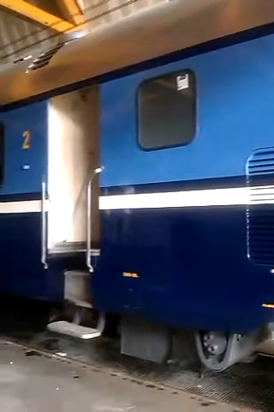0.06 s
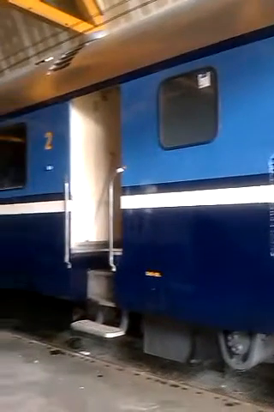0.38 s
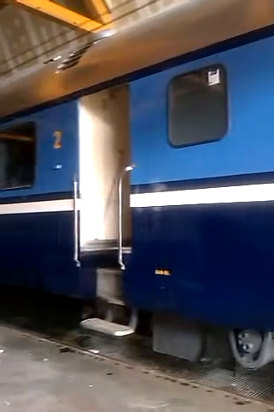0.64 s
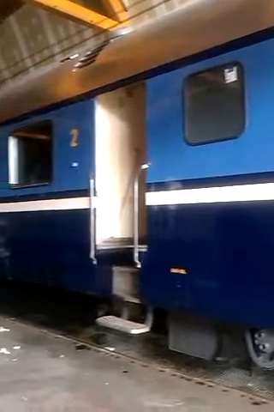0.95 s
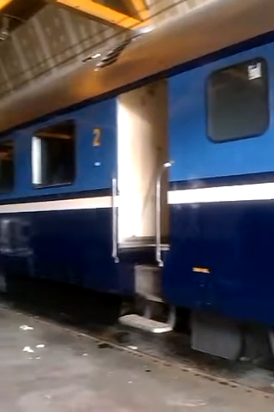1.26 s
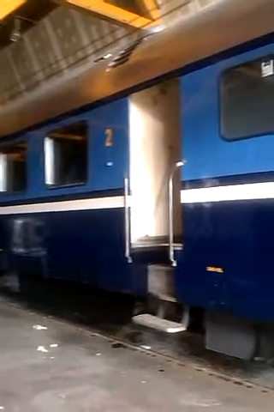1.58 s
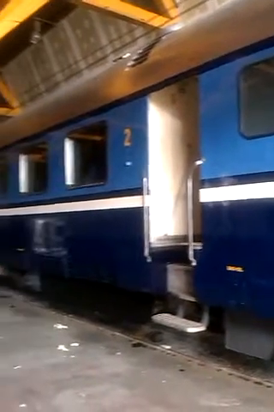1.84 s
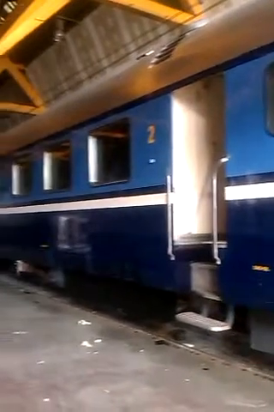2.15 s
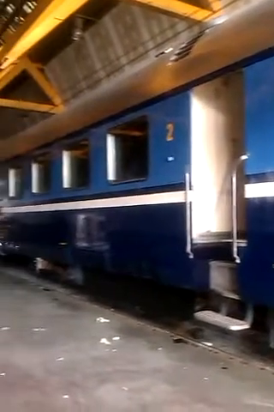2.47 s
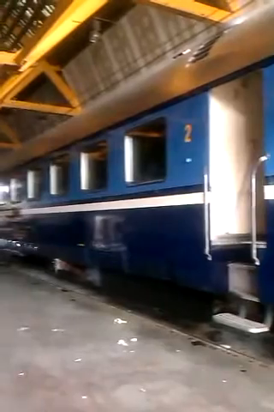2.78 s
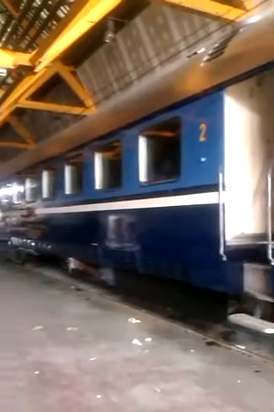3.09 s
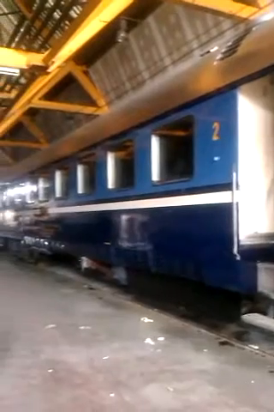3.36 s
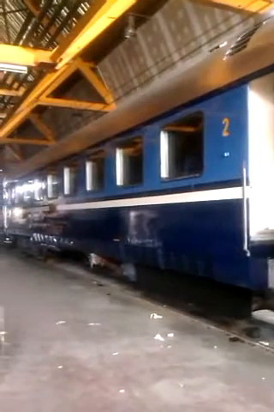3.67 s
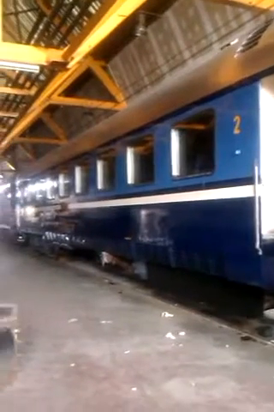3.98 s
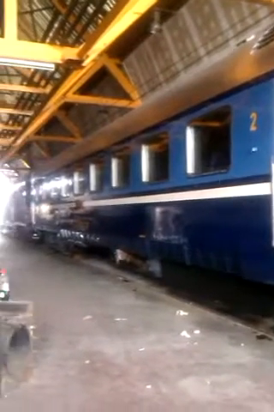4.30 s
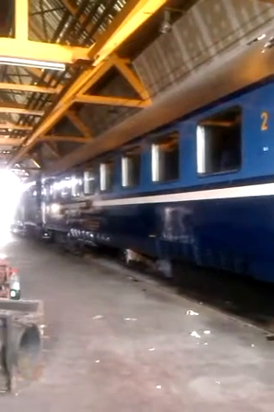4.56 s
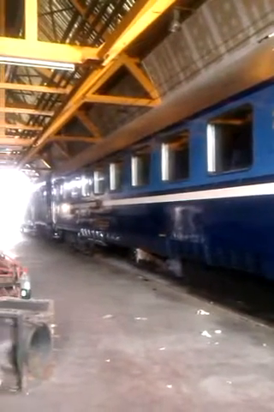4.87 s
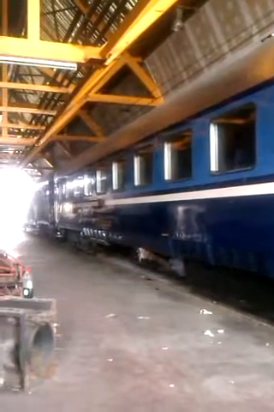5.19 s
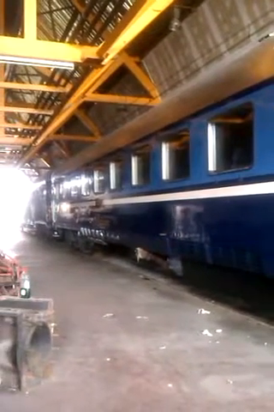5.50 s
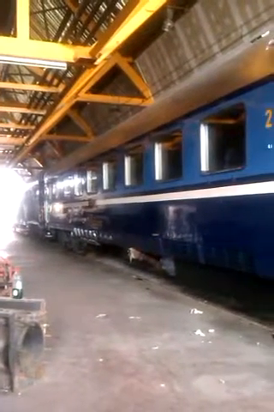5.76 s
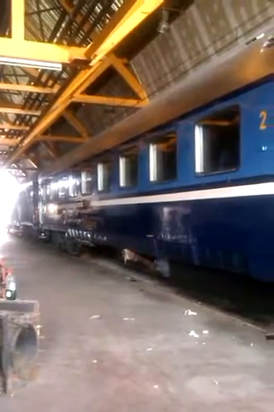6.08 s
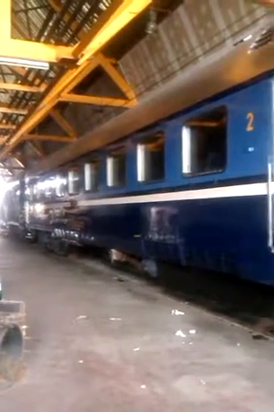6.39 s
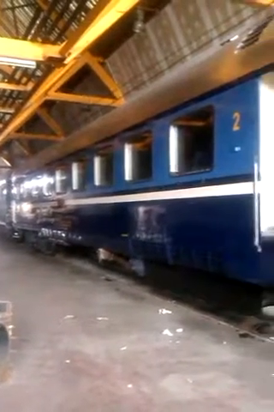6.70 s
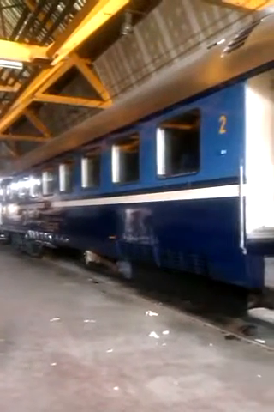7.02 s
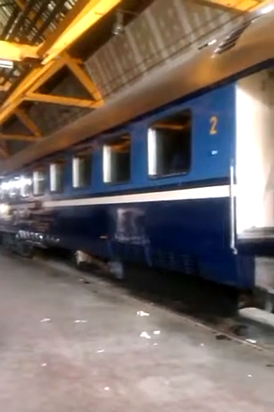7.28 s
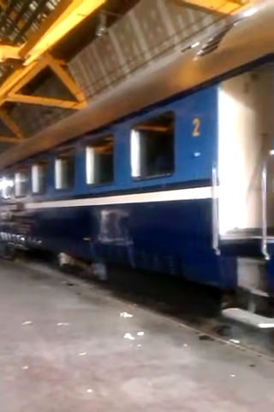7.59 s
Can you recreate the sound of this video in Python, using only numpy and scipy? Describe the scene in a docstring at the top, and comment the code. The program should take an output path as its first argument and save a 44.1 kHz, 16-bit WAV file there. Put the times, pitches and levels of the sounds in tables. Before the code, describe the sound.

A diesel railcar engine idles close by in a workshop hall, loud and even from the first moment through all eight seconds. Its dense drone chugs about six or seven times a second, the speed swaying only very slightly. On top are a fast metallic clatter from the cylinders and a steady whine of several gear tones, blurred by the hall. Behind them a cooling fan gives a low hum and a rush of air, with a faint, thin, high whistle that flutters.

Between about 2 and 3.5 seconds the listener turns to look down the hall, and the whine and clatter soften a little and stay that way. The whistle dips briefly around 3 seconds. At about 7.3 seconds one gear tone rings out for half a second, and around 7.5 seconds the drone grows slightly fuller as the engine keeps running.

```python
"""A diesel railcar engine idles at about 785 rpm in a workshop hall, its speed swaying gently.
Exhaust and engine block repeat one four-stroke cycle 6.5 times a second, making a dense, chugging drone.
Over it, six cylinders clatter as they fire and gear teeth whine as they mesh. Behind it, the cooling
fan hums, its air rushes, and air in a narrow gap gives a thin, fluttering whistle.
The engine softens a little as the listener turns away to look down the hall."""
import sys
import numpy as np
from scipy import signal
from scipy.fft import rfft, irfft, next_fast_len
from scipy.io import wavfile

SR = 44100
rng = np.random.default_rng(int(sys.argv[2]) if len(sys.argv) > 2 else 0)


def to_wav(s):
    """Save 16-bit WAV."""
    ch = np.atleast_2d(s).T  # columns
    pcm = np.round(np.clip(ch, -1, 1) * 32767)  # PCM
    wavfile.write(sys.argv[1], SR, pcm.astype(np.int16))


N = 346185
TIME = np.arange(N) / SR
IDLE_RPM, CYLINDERS = 785.3, 6


def amp(db):
    """Turns decibels into a gain to multiply by."""
    return 10 ** (np.asarray(db) / 20)


def unit(x):
    """Scales a signal to an average strength (rms) of 1."""
    return x / np.sqrt(np.mean(abs(x) ** 2) + 1e-20)


def level_at(spectrum, hz):
    """Looks up a level in dB between the pitches of a table."""
    pitch_hz, level_db = np.transpose(spectrum)
    return np.interp(np.log(hz + 1), np.log(pitch_hz + 1), level_db)


def colour(noise, spectrum):
    """Shapes white noise of rms 1 to a table of levels in dB per Hz."""
    size = next_fast_len(N)
    gain = amp(level_at(spectrum, np.fft.rfftfreq(size, 1 / SR))) * np.sqrt(SR / 2)
    return irfft(rfft(noise, size) * gain, size)[:N]


def wander(hz):
    """A smooth random wobble of rms 1 that moves up to about hz times a second."""
    size = next_fast_len(N)
    freqs = np.fft.rfftfreq(size, 1 / SR)
    spectrum = rng.standard_normal((len(freqs), 2)) @ [1, 1j]
    return unit(irfft(spectrum * (freqs > 0) / (1 + (freqs / hz) ** 2), size)[:N])


def bump(middle_s, length_s):
    """Rises from 0 to 1 and falls back, with a flat top."""
    return np.exp(-(2 * (TIME - middle_s) / length_s) ** 4)


def fuzzy_tone(hz, width_hz, clock_s):
    """A tone of rms 1 that wobbles at random, smearing its pitch over width_hz."""
    blur = wander(width_hz / 2) + 1j * wander(width_hz / 2)
    return unit((blur * np.exp(2j * np.pi * hz * clock_s)).real)


# Cooling air and the rumble of the hall: pitch_hz, level_db_per_hz
AIR_SPECTRUM = [(12, -85), (35, -73), (48, -63.5), (62, -70), (108, -59.5), (135, -60), (190, -61),
                (240, -54.5), (600, -53.5), (950, -50.5), (1300, -58.5), (2600, -58.5), (5000, -85.5),
                (16000, -130)]
def air_rush(swell_db=0.4, swell_hz=5):
    """Swirling air from the cooling fan makes a slightly uneven rush."""
    return colour(rng.standard_normal(N) * amp(swell_db * wander(swell_hz)), AIR_SPECTRUM)


# The tones of the fan's hum: waves_per_turn, level_db
FAN_TONES = [(1, -43.5), (2, -41.5), (3, -42), (4, -53), (5, -39.5), (17, -40)]
def fan_hum(cycles, turns_per_cycle=6.838):
    """The fan spins at its own speed, so its low hum beats against the engine's tones."""
    turns = cycles * turns_per_cycle
    return sum(amp(db) * np.sqrt(2) * np.sin(2 * np.pi * (waves * turns + rng.random()))
               for waves, db in FAN_TONES)


# The tones of the whistle: pitch_hz, width_hz, relative_level_db
WHISTLE_TONES = [(7550, 156, -46.5), (8180, 38, -56.5), (13940, 70, -67.5)]
# Where the whistle falters: middle_s, length_s, change_db
WHISTLE_DIPS = [(3.198, 0.65, -4)]
def air_whistle(gain_db=1, flutter_db=1.1, flutter_hz=10):
    """Air through a narrow gap whistles high, flutters and briefly falters."""
    dip_db = sum(db * bump(middle_s, length_s) for middle_s, length_s, db in WHISTLE_DIPS)
    strength = amp(gain_db) * unit(amp(dip_db + flutter_db * wander(flutter_hz)))
    return strength * sum(amp(db) * fuzzy_tone(hz, width_hz, TIME) for hz, width_hz, db in WHISTLE_TONES)


# The gears' tones at average speed: pitch_hz, width_before_blur_hz, level_db, turned_away_change_db
GEAR_TONES = [(876, 4, -42.5, 0.5), (1210, 8, -38.5, 1), (1439, 6, -32.5, -3.5), (1585, 4, -38, 0),
              (2151, 10, -33.5, 0), (2310, 3, -39, -1), (2538, 5.7, -32.5, -6), (2660, 33, -35, -2.5),
              (3192, 4, -39, 0), (4068, 28, -42.5, -1.5)]
# The gear tone nearest this pitch rings out briefly: pitch_hz, middle_s, length_s, rise_db
GEAR_RING = (1437, 7.35, .55, 7.5)
def gear_whine(cycles, cycle_hz, away, core_hz=9, blur_hz=11):
    """Meshing teeth sing in step with the engine: each a steady tone inside a blur of echoes."""
    clock_s = cycles / cycle_hz  # runs fast or slow with the engine
    ring_hz, middle_s, length_s, rise_db = GEAR_RING
    ringing_hz = min((row[0] for row in GEAR_TONES), key=lambda hz: abs(hz - ring_hz))
    whine = np.zeros(N)
    for hz, width_hz, db, away_db in GEAR_TONES:
        steady = np.sqrt(2) * np.sin(2 * np.pi * (hz * clock_s + rng.random()))
        echoes = fuzzy_tone(hz, width_hz + blur_hz, clock_s)
        tone = unit(core_hz / width_hz * steady + echoes)  # tones wider than core_hz are mostly blur
        ring_db = rise_db * bump(middle_s, length_s) if hz == ringing_hz else 0
        whine += amp(db + away_db * away + ring_db) * tone
    return whine


# The noise of burning fuel and valves: pitch_hz, relative_level_db_per_hz
CLATTER_SPECTRUM = [(300, -67), (900, -58), (1300, -56), (1600, -52), (2150, -51.5), (2650, -55),
                    (3100, -56.5), (3400, -61), (3900, -61.5), (4500, -69.5), (5800, -75.5), (6750, -79.5),
                    (7150, -86.5), (8600, -92.5), (10200, -93), (11200, -118)]
def cylinder_clatter(cycles, cycle_hz, decay_s=0.0068, cylinder_db=3.0, firing_db=5.0, hall_fill=2.13):
    """Each firing is a burst of rattling metal, no two alike; the hall fills the gaps between them."""
    firing, since_firing = np.divmod(cycles * CYLINDERS, 1)
    firing = firing.astype(int)
    db = cylinder_db * rng.uniform(-1, 1, CYLINDERS)[firing % CYLINDERS]  # each cylinder has its level
    db += firing_db * np.clip(rng.standard_normal(N), -2, 2)[firing]  # and each firing strays from it
    bursts = amp(db) * np.exp(-since_firing / (CYLINDERS * cycle_hz * decay_s))
    rattle = np.hypot(bursts, hall_fill) * rng.standard_normal(N)
    return colour(unit(rattle), CLATTER_SPECTRUM)


# Each pitch range crosses the hall by its own path and chugs at its own moment; quick swells are the
# exhaust pulsing: low_hz, high_hz, swells_per_cycle, depth_0_to_1, moment_cycles
CHUG_PATTERN = [(205, 245, 1, .65, .98), (205, 245, 2, .5, .01), (245, 320, 1, .8, .31),
                (205, 320, 1, .58, .25), (205, 320, 2, .38, .13), (205, 320, 3, .17, .32),
                (205, 320, 5, .4, .1), (340, 460, 1, .35, .84), (340, 460, 9, .45, .09),
                (460, 520, 1, .65, .31), (460, 520, 2, .35, .03), (520, 600, 1, .8, .94),
                (600, 800, 1, .3, .66), (600, 800, 2, .5, .21), (600, 800, 3, .55, .25),
                (250, 500, 1, .28, .31), (250, 500, 2, .18, .09), (250, 500, 3, .1, .32),
                (205, 700, 1, .26, .23), (205, 700, 2, .24, .12), (205, 700, 3, .1, .24),
                (205, 700, 4, .12, .1), (205, 700, 5, .12, .07), (205, 700, 6, .12, .13),
                (205, 700, 7, .13, .1), (205, 700, 8, .29, .12), (205, 700, 9, .25, .09),
                (205, 700, 10, .3, .03)]
def chugging_tones(gains, cycles, passes=80, step=.25, size=2 ** 13):
    """Nudges the tones' timing until they swell together in chugs, then loops that engine cycle."""
    hz = np.arange(1, len(gains) + 1) * IDLE_RPM / 120
    tones = gains * np.exp(2j * np.pi * rng.random(len(gains)))
    for _ in range(passes):
        for low_hz, high_hz, swells, depth, moment in CHUG_PATTERN:
            band = tones * (hz > low_hz) * (hz < high_hz)
            # tones n places apart beat n times a cycle
            beating = 2 * np.vdot(band[:-swells], band[swells:]) / np.vdot(band, band)
            lacking = depth * np.exp(-2j * np.pi * swells * moment) - beating
            nudge = lacking * np.roll(band, swells) + lacking.conj() * np.roll(band, -swells)
            tones = tones + step * (band != 0) * nudge
        tones = gains * np.exp(1j * np.angle(tones))  # keep the new timing, restore the levels
    one_cycle = irfft(np.r_[0, tones], size) * size / np.sqrt(2)
    return np.interp(cycles % 1, np.arange(size + 1) / size, np.r_[one_cycle, one_cycle[0]])


# The drone grows fuller near the end: low_hz, high_hz, middle_s, length_s, rise_db
DOORWAY_SWELL = (350, 550, 7.58, .6, 1.5)
def doorway_swell(drone):
    """The drone's middle pitches swell as the listener faces the open doorway."""
    low_hz, high_hz, middle_s, length_s, rise_db = DOORWAY_SWELL
    band_filter = signal.butter(3, [low_hz, high_hz], "bandpass", fs=SR, output="sos")
    middle = signal.sosfiltfilt(band_filter, drone)
    return drone + middle * (amp(rise_db * bump(middle_s, length_s)) - 1)


# The drone's strong tones: waves_per_cycle, relative_level_db
STRONG_TONES = [(6, -36), (9, -34.5), (10, -44.5), (12, -35.5), (19, -36.0), (28, -46.5), (30, -35),
                (35, -35.5), (36, -29.0), (38, -33.5), (39, -28.5), (40, -35.5), (41, -40.5), (42, -37.5),
                (43, -39.0), (44, -32.5), (46, -30.0), (50, -34.5), (53, -40), (56, -39.5), (57, -38.0),
                (58, -31.5), (59, -37.5), (60, -34), (61, -33), (62, -33.5), (64, -37), (67, -33.0),
                (68, -39.5), (69, -36.5), (72, -32.0), (73, -36), (74, -29), (75, -38.5), (78, -40.0),
                (79, -41), (83, -35.0), (87, -34.5), (88, -38), (92, -39), (93, -38), (97, -41),
                (98, -39.0), (99, -34.5), (107, -40.0)]
# The typical level of each tone around them: pitch_hz, relative_level_db
WEAK_TONES = [(7, -82), (27, -47), (72, -50), (98, -48.5), (107, -64), (120, -44), (180, -47), (250, -43),
              (520, -43.5), (640, -45.5), (770, -45.5), (1050, -53), (1600, -58)]
def engine_drone(cycles, cycle_hz, sway, scatter_db=4, drift_per_hz=0.087 / 420, drift_hz=0.71, count=250):
    """Exhaust and block drone; as speed and listener move, standing waves make tones swell and fade."""
    hz = np.arange(1, count + 1) * cycle_hz
    db = level_at(WEAK_TONES, hz) + scatter_db * rng.uniform(-0.986, 1, count)
    for waves, level_db in STRONG_TONES:
        db[round(waves) - 1] = level_db
    loose = np.minimum(drift_per_hz * hz, .5)  # short waves shift most
    shifting = sum(move * chugging_tones(amp(db) * loose, cycles) for move in (sway, wander(drift_hz)))
    steady = chugging_tones(amp(db) * np.sqrt(1 - 2 * loose ** 2), cycles)
    return steady + shifting


def engine_rpm(sag_rpm_per_s=.137, sway_rpm=1.1, period_s=1.064, first_peak_s=.365):
    """The idle sinks slowly while the governor, which holds the speed, swings evenly around it."""
    swing = np.cos(2 * np.pi * (TIME - first_peak_s) / period_s)
    return IDLE_RPM - sag_rpm_per_s * TIME + sway_rpm * swing


# The listener looks down the hall, then partly back toward the engine: time_s, turned_away_0_to_1
LISTENER_TURN = [(0, 0.25), (1.8, 0), (3.6, 0.86), (6.7, 0.77), (7.3, 0.7), (7.85, 0.6)]
def scene():
    """The engine's speed paces drone, gears, clatter and fan; turning away softens the engine."""
    rate_hz = engine_rpm() / 120  # two turns make one cycle
    cycles, cycle_hz = np.cumsum(rate_hz) / SR, rate_hz.mean()
    away = np.interp(TIME, *np.transpose(LISTENER_TURN))
    drone = engine_drone(cycles, cycle_hz, sway=unit(rate_hz - cycle_hz))
    drone = doorway_swell(drone) * amp(.5 - 0.28 * away)
    whine = gear_whine(cycles, cycle_hz, away)
    clatter = cylinder_clatter(cycles, cycle_hz) * amp(.5 - 0.72 * away)
    return (drone + whine + clatter + fan_hum(cycles) + air_rush() + air_whistle())[None]


def record(dry, ceiling=.71, cutoff_hz=15800):
    """Shaves off the tallest peaks, then removes the very highest treble."""
    clipped = np.clip(dry, -ceiling, ceiling)
    lowpass = signal.firwin(511, cutoff_hz, window=("kaiser", 9), fs=SR)
    return signal.oaconvolve(clipped, lowpass[None], "same")


dry = scene()
out = record(dry)
to_wav(out)
```